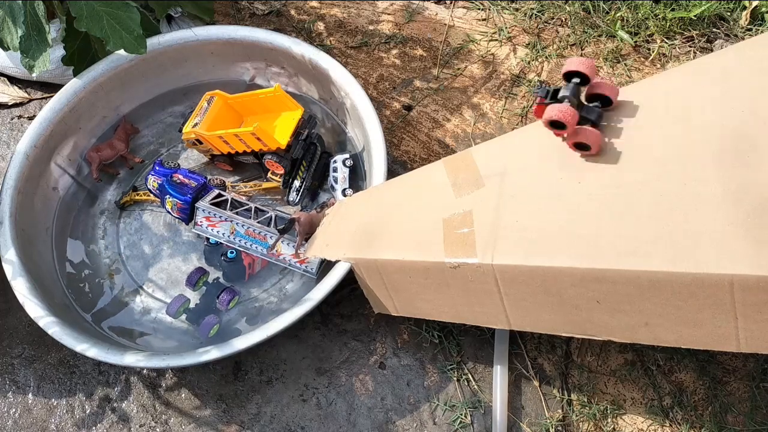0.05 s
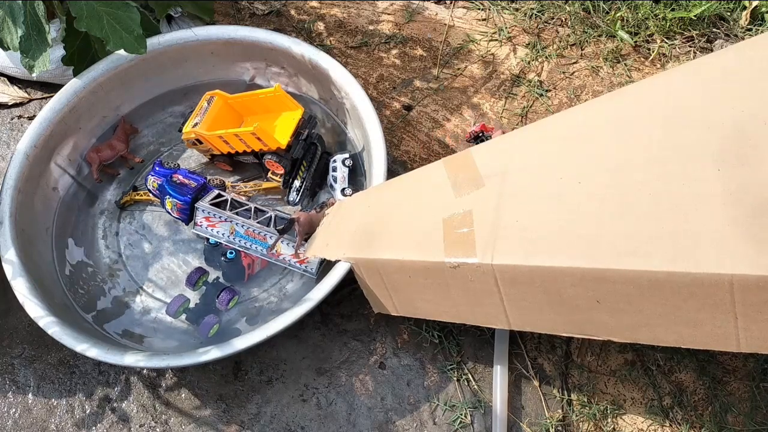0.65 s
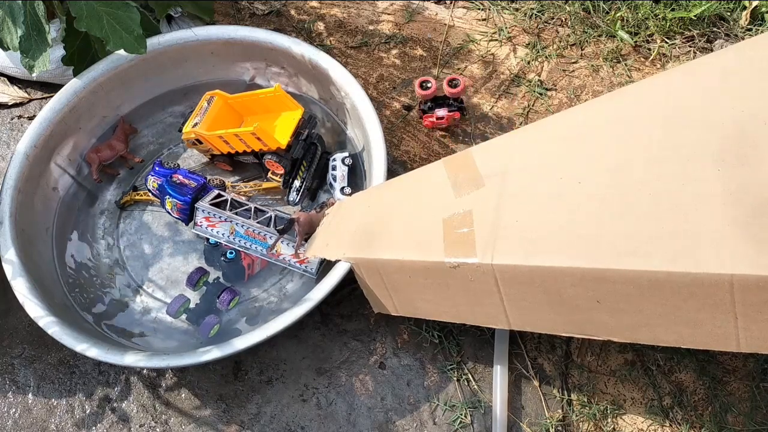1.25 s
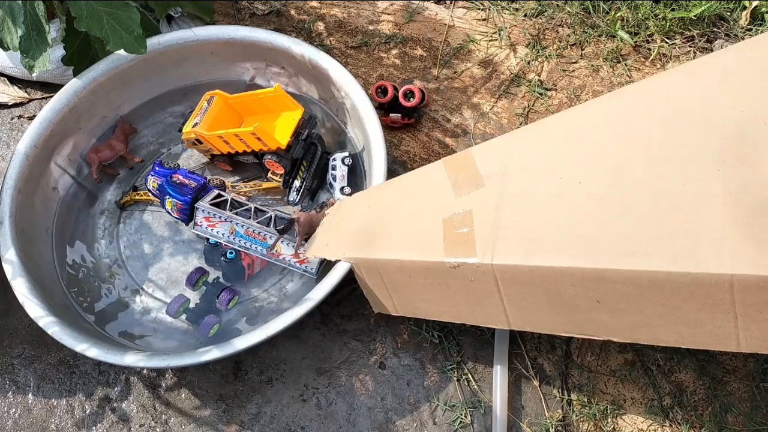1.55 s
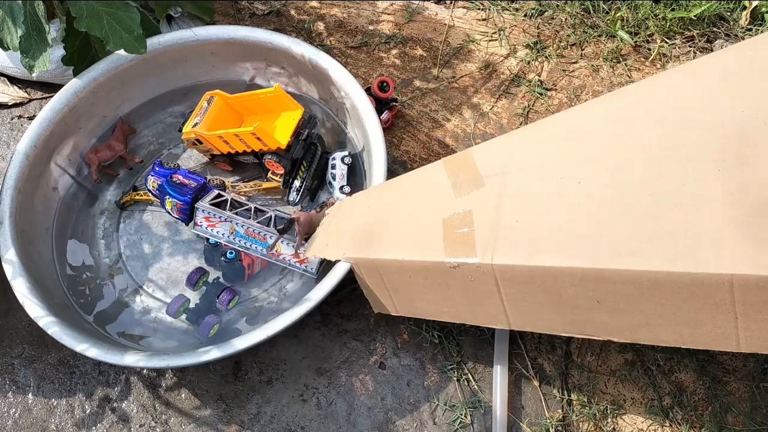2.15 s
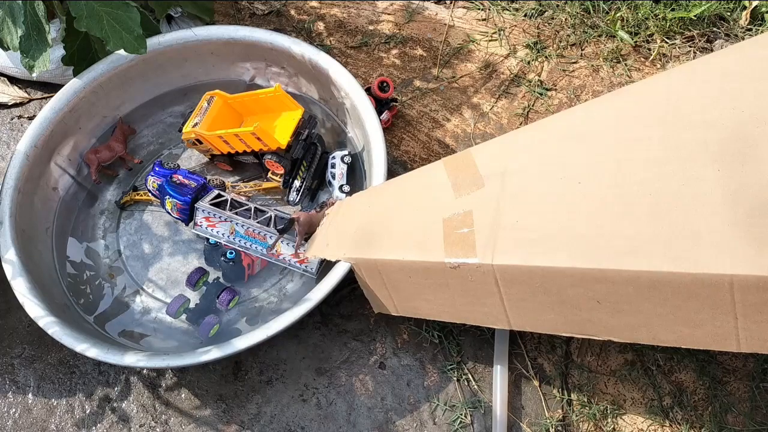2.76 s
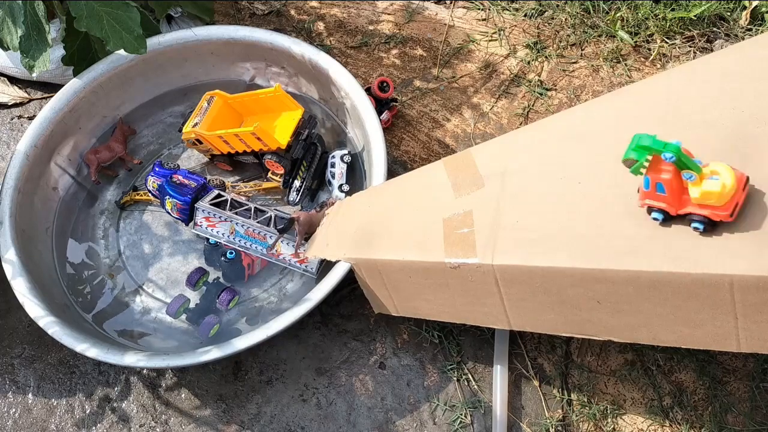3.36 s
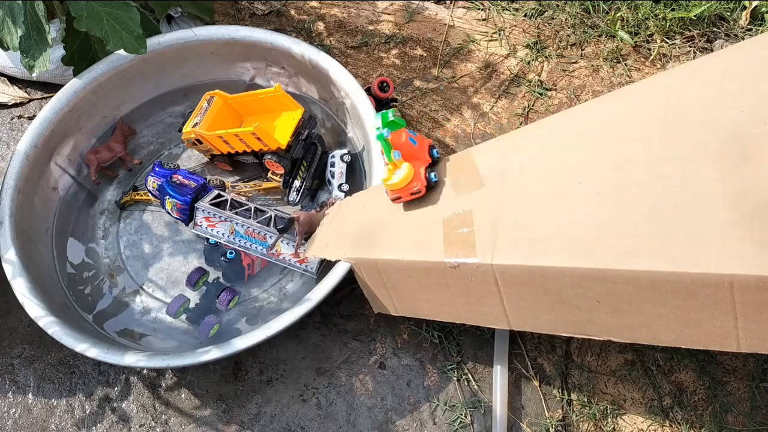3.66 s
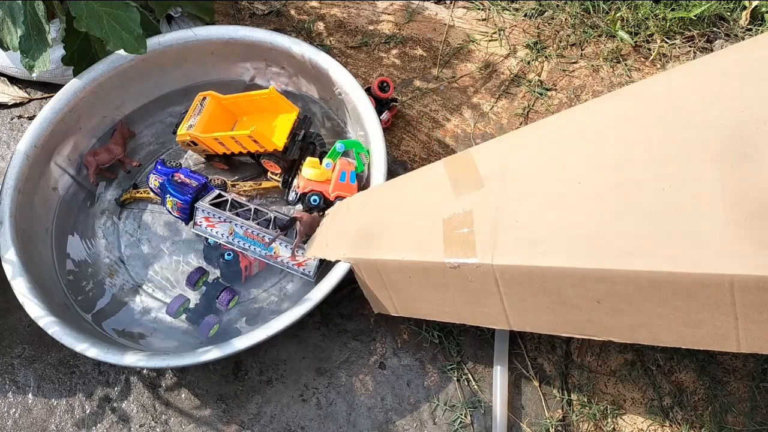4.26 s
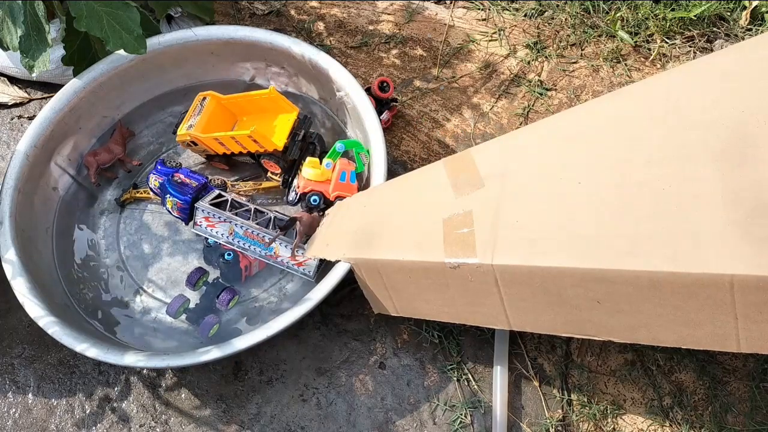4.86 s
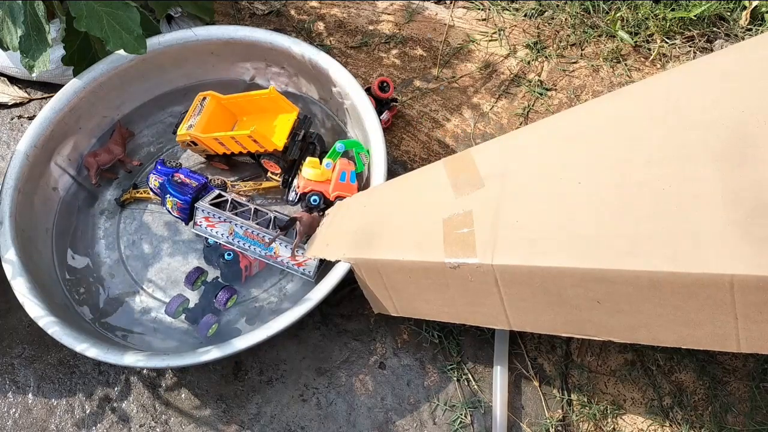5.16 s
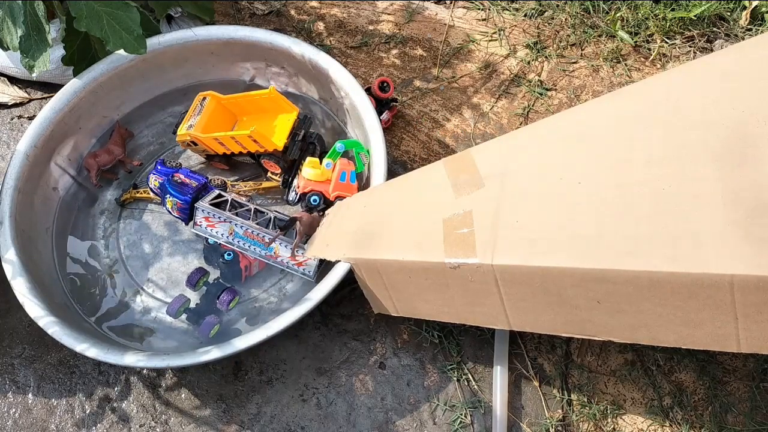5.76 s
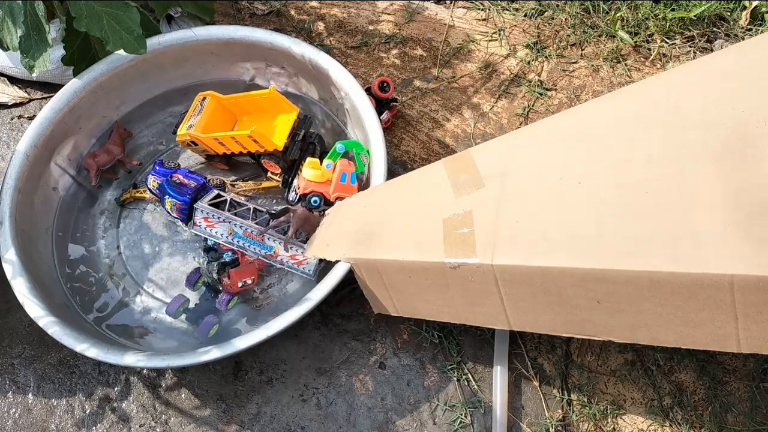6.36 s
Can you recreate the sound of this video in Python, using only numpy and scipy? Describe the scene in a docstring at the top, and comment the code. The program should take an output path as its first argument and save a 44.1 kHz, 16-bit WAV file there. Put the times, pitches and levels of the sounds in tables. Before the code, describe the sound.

A toy truck is revved twice, whirrs and thumps down a cardboard ramp; a second toy rumbles down and clatters into a metal basin.

```python
"""Two rasping, whining pushes spin up the flywheel of a friction-motor toy truck, outdoors. Its gears
whirr as it thumps down a cardboard ramp, tumbles off and coasts to a stop. A second toy is set on the
board, rumbles down on hard wheels, clatters into other toys and strikes a water-damped metal basin.
Gear teeth chatter in the gearbox; wheels and blows ring the board. Faint yard air lies behind."""
import sys
import numpy as np
from scipy import signal
from scipy.fft import rfft, irfft, next_fast_len
from scipy.io import wavfile
from scipy.ndimage import uniform_filter1d, map_coordinates

SR = 44100
rng = np.random.default_rng(int(sys.argv[2]) if len(sys.argv) > 2 else 0)


def put_to_file(sound):
    """Save the sound as 16-bit audio at rate SR, in the file named by the first command-line argument."""
    columns = np.atleast_2d(sound).T  # one column per channel
    safe = np.clip(columns, -1, 1)
    whole_steps = np.round(safe * 32767)
    wavfile.write(sys.argv[1], SR, whole_steps.astype(np.int16))


N = 287091

# gear chatter spectrum (frequency [Hz], density [dB])
GEAR_SPECTRUM = [(250, -23), (500, -19.5), (1250, -12.5), (1900, -3), (3000, -6.5), (4200, -6.5),
                 (4900, -10.5), (7200, -15), (8300, -18), (9500, -23), (10800, -19.5), (15500, -28)]
# gearbox resonances (frequency [Hz], width [Hz], lift [dB])
GEARBOX_MODES = [(3570, 150, 2.5), (4420, 99, 8.5), (5520, 260, 4.5)]
# a band near 2 kHz sweeping through the whirr as the truck moves (time [s], frequency [Hz])
SWEEP_PITCH = [(.08, 2080), (.26, 2550), (.7, 2020), (.98, 2680), (1.22, 1850), (1.5, 2250), (2.3, 1780),
               (2.85, 2020), (4.3, 1650)]
# coasting gear train (time [s], level [dB])
COAST_LEVEL = [(0, -34.5), (.37, -37.5), (.56, -32), (.95, -32.5), (1.12, -28.5), (1.65, -33), (2.12, -31),
               (2.5, -33.5), (2.7, -39), (3.2, -41.5), (3.9, -44.5)]
# spin-up pushes (start [s], attack [s], hold [s], gear chatter [dB], tyre scrub [dB])
PUSHES = [(0.386, 0.088, .035, -25.5, -39.5), (0.979, .01, 0.082, -25, -40.5)]


def gear_whirr(body_db=-2, sweep_db=-6.5, hiss_db=-7.5, push_hiss_db=-3, split_hz=7000):
    """Loose gear teeth chatter: louder and brighter under a push, fading as the truck coasts."""
    coast_db, = curves(COAST_LEVEL)
    stall = (1 - ramp(3.9, .44)) ** 1.37  # friction stops the gears
    coast = amp(coast_db) * stall
    push = sum(amp(db) * envelope(s, attack_s, hold_s, .03) for s, attack_s, hold_s, db, _ in PUSHES)
    teeth = shifting(grains(rate_hz=2200, life_s=.0008, spread_db=2), depth_db=2.8, size=512, frames=14)
    chatter = unit(lifted(coloured(teeth, GEAR_SPECTRUM), GEARBOX_MODES))
    body = filtered(chatter, lambda hz: 1 / (1 + (hz / split_hz) ** 8))
    sweep = np.array([resonance(curves(SWEEP_PITCH)[0], width_hz=160) for _ in range(2)])
    shadow_db = -3.5 * ramp(2.2, .299)  # truck drops behind the board
    bright_db = hiss_db + .25 * (coast_db - coast_db.max()) + shadow_db
    fade_db = -1.5 * ramp(TYRE_CONTACTS[0][0], .13)  # the sweep is fainter once on the board
    sweep_gain = amp(sweep_db + fade_db + 2.6 * wobble(20))
    whirr = amp(body_db) * np.hypot(coast, push) * unit(body) + sweep_gain * coast * sweep
    hiss = np.hypot(coast * amp(bright_db), push * amp(push_hiss_db)) * unit(chatter - body)
    return (whirr + hiss) * amp(wobble(45))


# wheel surges (start [s], length [s], first tooth rate [Hz], last [Hz], level [dB], overtone lift [dB])
SURGES = [(.434, .02, 3100, 3680, -23, -9), (.454, .066, 2200, 3600, -26.5, 0),
          (1.016, .054, 2900, 4000, -23, -2)]
# tooth-mesh overtones (harmonic number, level [dB])
MESH_OVERTONES = [(2, -3), (3, -3), (4, -13)]


def gear_whine(gain_db=-.5):
    """Under a push the teeth mesh firmly: a rough note gliding up in an S."""
    out = np.zeros((2, N))
    jitter = 1 + .022 * wobble(1500)
    flutter_db = 2.5 * wobble(500)
    for s, length_s, first_hz, last_hz, db, lift_db in SURGES:
        progress = ramp(s, length_s)
        on = (progress > 0) & (progress < 1)
        hz = first_hz + (last_hz - first_hz) * np.sin(np.pi / 2 * progress[on]) ** 2
        phase = 2 * np.pi * np.cumsum(hz * jitter[on]) / SR
        gain = amp(db + gain_db + flutter_db[on]) * np.sqrt(2 * np.sin(np.pi * progress[on]))
        partials = [(1, 0)] + [(k, partial_db + lift_db) for k, partial_db in MESH_OVERTONES]
        for k, partial_db in partials:
            out[:, on] += gain * amp(partial_db) * np.sin(k * phase + rng.uniform(0, np.pi / 2, (2, 1)))
    return out


# flywheel spin (time [s], speed [rev/s], hum [dB])
FLYWHEEL_SPIN = [(.52, 487, -57), (.97, 410, -64), (1.08, 510, -51), (1.4, 476, -62), (1.75, 425, -69),
                 (2.4, 350, -64)]


def flywheel(rasp_db=20, pinion_teeth=8):
    """The coasting flywheel hums and its pinion rasps."""
    spin_hz, hum_db = curves(FLYWHEEL_SPIN)
    hum = np.sin(2 * np.pi * np.cumsum(spin_hz) / SR)
    rasp = resonance(pinion_teeth * spin_hz, width_hz=240)
    return amp(hum_db) * during(FLYWHEEL_SPIN) * (hum + amp(rasp_db) * rasp)


def tyre_scrub():
    """Rubber tyres drag over the ground during the pushes."""
    level = sum(amp(db) * envelope(s, attack_s, hold_s, .061) for s, attack_s, hold_s, _, db in PUSHES)
    slips = grains(rate_hz=680, life_s=.001, spread_db=8)
    return level * coloured(slips, [(80, -25), (200, -4.5), (700, -10.5), (1300, -2), (2500, -30)])


# tyres on the board between hops (start [s], attack [s], hold [s], release [s], level [dB])
TYRE_CONTACTS = [(1.716, .035, 0.053, .017, -27), (1.877, .004, .37, 0.053, -25.5),
                 (2.387, 0.011, .012, 0.028, -32.5)]
# soft tyres on cardboard (frequency [Hz], density [dB])
TYRE_SPECTRUM = [(41, -11.5), (70, -4), (118, -6.5), (252, -3), (343, -3), (473, -14), (538, -17.5),
                 (790, -13.5), (1070, -23), (1500, -25), (1950, -40), (3300, -120)]
# board note under the truck (time [s], frequency [Hz])
TRUCK_NOTE = [(1.82, 415.5), (1.92, 290), (2.28, 204.4)]


def truck_rolling(tyres_db=-5, note_db=-8, growth_db_per_s=15):
    """Soft tyres patter over the corrugations, louder as the truck gathers speed."""
    patter = shifting(grains(rate_hz=200, life_s=.005, spread_db=2), depth_db=3.5, size=2048, frames=4)
    level = np.zeros(N)
    for s, attack_s, hold_s, release_s, db in TYRE_CONTACTS:
        growth_db = growth_db_per_s * hold_s * ramp(s, hold_s)
        level += amp(db + growth_db) * envelope(s, attack_s, hold_s, release_s)
    tyres = coloured(patter, TYRE_SPECTRUM)
    return level * (amp(tyres_db) * tyres + amp(note_db) * board_note(TRUCK_NOTE))


def board_note(pitch_rows):
    """The board's resonance, driven evenly by the wheels."""
    note = resonance(curves(pitch_rows)[0], width_hz=40)
    power = np.abs(uniform_filter1d(note ** 2, size=3000))
    return note / np.sqrt(power + .19)


# blows on the cardboard (time [s], level [dB], panel pitch [Hz])
BOARD_BLOWS = [(1.8, -15, 407), (1.882, -13, 298), (2.087, -17.5, 262), (2.119, -15.5, 232),
               (2.19, -17.5, 293), (4.491, -20, 397), (4.498, -25, 727), (4.584, -32.5, 449),
               (5.277, -16, 416), (5.483, -18, 627), (5.748, -17, 276), (5.788, -19, 314),
               (5.946, -17.5, 516)]
# struck cardboard (frequency [Hz], density [dB])
PANEL_SPECTRUM = [(59, -51.5), (100, -27), (210, -8), (417, -6.5), (553, -5.5), (608, -10), (1160, -13.5),
                  (1500, -33), (1940, -24), (2500, -21), (3250, -63), (5500, -120)]


def thumps(tone_db=-2, slap_db=-10.5, panel_t60_s=.1, edge_t60_s=.18):
    """Each blow rings the part of the board it lands on; the free edge rings longer."""
    out = np.zeros((2, N))
    for blows, t60_s in [(BOARD_BLOWS, panel_t60_s), (judder(), edge_t60_s)]:
        for s, db, hz in blows:
            slap = burst(PANEL_SPECTRUM, [(250, .078), (550, .39), (1000, .048), (2500, .05)])
            add(out, s, amp(db) * (amp(tone_db) * ring(hz, t60_s) + amp(slap_db) * slap))
    return out


def judder(start_s=2.493, gap_s=.0155, hz=572.5, db=-15.5, swell_db=3.5, count=7):
    """The tumbling truck judders on the board's edge: rows of (time [s], level [dB], pitch [Hz])."""
    k = np.arange(count)
    late_s, detune = rng.standard_normal((2, count)) * [[.002], [.06]]
    times_s = start_s + gap_s * k + late_s * (k > 0)
    swell = np.sin(np.pi * (k + .5) / count)
    return list(zip(times_s, db + swell_db * swell, hz * (1 + detune)))


TOY_START_S, TOY_FREE_S, TOY_EXIT_S = 4.937, 5.054, 5.925
# hard wheels on cardboard (frequency [Hz], density [dB])
WHEEL_SPECTRUM = [(60, -5), (120, -10), (170, -3), (290, -2.5), (480, -7), (850, -8.5), (1080, -17),
                  (1400, -21.5), (2200, -22.5), (4000, -44)]
# board resonances (frequency [Hz], width [Hz], lift [dB])
BOARD_MODES = [(279, 15, 3), (398, 16, 6), (620, 62, 3), (728, 26, 6), (864, 170, 2.5), (1216, 95, 7)]
# board note under the second toy (time [s], frequency [Hz])
TOY_NOTE = [(5.25, 410), (5.33, 638), (5.55, 600), (5.62, 256), (5.78, 274.6), (5.92, 504)]


def toy_rolling(wheels_db=-20, note_db=-25, held_db=-8, support_s=5.751, support_db_per_s=94):
    """Hard wheels boom the board with speed; muted by a hand at first, then by the supported end."""
    patter = shifting(grains(rate_hz=600, life_s=.003, spread_db=2), depth_db=3, size=2048, frames=4)
    wheels = unit(lifted(coloured(patter, WHEEL_SPECTRUM), BOARD_MODES))
    muted_db = held_db * (clock() < TOY_FREE_S) - support_db_per_s * np.maximum(clock() - support_s, 0)
    level = toy_speed() * amp(muted_db)
    return level * (amp(wheels_db) * wheels + amp(note_db) * board_note(TOY_NOTE))


def toy_speed(stop_s=.03):
    """Second toy's even acceleration: 0 at rest, 1 at the ramp's end, then quickly 0."""
    return ramp(TOY_START_S, TOY_EXIT_S - TOY_START_S) * (1 - ramp(TOY_EXIT_S, stop_s))


# plastic impacts (time [s], level [dB], relative treble [dB], hollow pitch [Hz], rebound loss [dB])
PLASTIC_HITS = [(.985, -14, -14.5, 3000, 11.5), (2.512, -13.5, -12, 2160, 5.5),
                (2.575, -19, -11, 2230, 20.5), (2.747, -15, -12.5, 2340, 6.5),
                (2.902, -24.5, -12.5, 2600, 17), (2.966, -25.5, -10, 2600, 19),
                (3.838, -31, -6.5, 3800, 20), (4.499, -31.5, -27, 2380, 16), (5.053, -31.5, -30, 2740, 20),
                (5.716, -20.5, -17, 2100, 20), (5.786, -23, -16, 3530, 22), (5.924, -6, -27.5, 2400, 6.5),
                (5.947, -10, -36, 1480, 17), (5.962, -8.5, -28, 2050, 10.5), (6.034, -6.5, -21, 940, 24),
                (6.094, -24, -26, 894, 18), (6.128, -25, -30.5, 1590, 20), (6.1699, -11.5, -14, 3360, 25),
                (6.31, -38.5, -30, 3100, 20)]
# struck plastic (frequency [Hz], density [dB])
PLASTIC_SPECTRUM = [(240, -19), (400, -11.5), (535, -8), (663, -11.5), (1020, -12.5), (1320, -6.5),
                    (1880, -5.5), (2750, -10.5), (3790, -12), (5560, -24), (15500, -51.5)]
# its decay (frequency [Hz], T60 [s])
PLASTIC_T60 = [(500, 0.3), (2000, 0.1), (5000, 0.11), (14000, 0.12)]


def clacks(body_db=-9, snap_db=-6, hollow_db=8, rebound_s=.0115, contacts=4):
    """Plastic strikes plastic and rebounds: a short hollow ring under a snap."""
    out = np.zeros((2, N))
    for s, db, treble_db, hz, loss_db in PLASTIC_HITS:
        hollow_mode = [(hz, .27 * hz, hollow_db)]
        for k in range(contacts):
            body = lifted(burst(PLASTIC_SPECTRUM, PLASTIC_T60), hollow_mode) / amp(hollow_db / 2)
            snap = burst([(2500, -36), (6000, -2), (15000, -9)], [(3000, .32), (14000, .07)])
            clack = amp(body_db) * body + amp(snap_db + treble_db) * snap
            add(out, s + k * rebound_s, amp(db - k * loss_db) * clack)
    return out


# basin modes (frequency [Hz], level [dB], T60 [s])
BASIN_MODES = [(340, -16.5, 0.19), (530, -4.5, 0.38), (557, 0, 0.35), (720, -19, 0.27), (990, 4, 0.28),
               (1200, -6, 0.4), (1345, 7, 0.29), (1470, 4, 0.3), (1500, -3, 0.2), (1650, -6.5, 0.38),
               (1780, 2, 0.34), (1900, -9.5, 0.33), (1954, -2.5, 0.31), (2030, 1, 0.25), (2020, 4, 0.27),
               (2363, -5, 0.24), (2490, -10, 0.45), (2520, -12.5, 0.17), (2853, -22, 0.15),
               (3920, -14.5, 0.15)]
# modes of its water-loaded floor (frequency [Hz], level [dB], T60 [s])
FLOOR_MODES = [(161.7, -16, 0.35), (373, -3.5, 0.43), (413, -11.5, 0.26)]
# wash of crowded modes (frequency [Hz], density [dB])
WASH_SPECTRUM = [(88, -48), (150, -4.5), (234, -40), (302, -5), (509, -12), (643, -17), (985, -4),
                 (1150, -23), (1340, -9.5), (4060, -11), (15500, -40)]
# its decay (frequency [Hz], T60 [s])
WASH_T60 = [(300, 0.34), (2000, 0.32), (5000, 0.15), (14000, 0.13)]


def basin(strike_s=6.171, modes_db=-31, wash_db=-23):
    """The toy strikes the metal basin; water damps the ring."""
    out = np.zeros((2, N))
    modes = sum(amp(db) * ring(hz, t60_s, rng.uniform(0, np.pi, (2, 1))) * rng.choice([-1, 1])
                for hz, db, t60_s in [*BASIN_MODES, *FLOOR_MODES])
    add(out, strike_s, amp(modes_db) * modes + amp(wash_db) * burst(WASH_SPECTRUM, WASH_T60))
    return out


# axles in their slots (frequency [Hz], density [dB])
RATTLE_SPECTRUM = [(1000, -40), (1600, -3), (2300, 1), (2800, -6), (3500, -5), (5000, -18), (8000, -45)]
# axle hiss (frequency [Hz], density [dB])
AXLE_SPECTRUM = [(2500, -30), (5000, -2), (7200, 0), (9500, -7), (15500, -13)]


def axle_rattle(rattle_db=-38, spin_db=-50, lip_db=-42.5, lip_s=5.845):
    """Once let go, the second toy's axles rattle and hiss with speed; wheels hiss over the ramp's lip."""
    speed = toy_speed()
    knocks = shifting(grains(rate_hz=220, life_s=.004, spread_db=4), depth_db=3, size=512, frames=14)
    spin = grains(rate_hz=300, life_s=.01, spread_db=3)
    lip = amp(lip_db) * envelope(lip_s, attack_s=.0405, hold_s=.03, release_s=.03)
    rattle = amp(rattle_db) * speed ** 1.21 * coloured(knocks, RATTLE_SPECTRUM)
    hiss = (amp(spin_db) * speed ** 1.3 + lip) * coloured(spin, AXLE_SPECTRUM)
    return ramp(TOY_FREE_S, .003) * (rattle + hiss)


# second toy's wheel catches (time [s], level [dB])
WHEEL_TICKS = [(5.1008, -47), (5.1976, -46), (5.3652, -41), (5.5248, -38), (5.5558, -35), (5.6186, -34),
               (5.6865, -36.5), (5.7882, -33)]


def wheel_ticks(gain_db=-9, t60_s=.1):
    """A wheel catches on its axle with a thin bright tick."""
    out = np.zeros((2, N))
    for s, db in WHEEL_TICKS:
        add(out, s, amp(db + gain_db) * burst(AXLE_SPECTRUM, [(7000, t60_s)]))
    return out


# yard hiss (frequency [Hz], density [dB])
AIR_SPECTRUM = [(200, -15), (400, -14.5), (1000, -21), (3000, -24.5), (4000, -22.5), (6500, -32.5),
                (15500, -40.5)]
# distant rumble (frequency [Hz], density [dB])
RUMBLE_SPECTRUM = [(12, -15.5), (25, -4), (50, 2.5), (95, -1), (150, -9), (260, -19), (600, -48.5),
                   (2000, -75.5)]


def outdoor_air(hiss_db=-62, rumble_db=-56):
    """Faint yard hiss over a distant rumble."""
    hiss = amp(hiss_db + .67 * wobble(4.4)) * coloured(rng.standard_normal((2, N)), AIR_SPECTRUM)
    return hiss + amp(rumble_db) * coloured(rng.standard_normal((2, N)), RUMBLE_SPECTRUM)


def amp(db):
    """Decibels to gain."""
    return 10 ** (np.asarray(db) / 20)


def unit(x):
    """x at rms 1."""
    return x / np.sqrt(np.mean(x ** 2) + 1e-20)


def clock():
    """Sample times in seconds."""
    return np.arange(N) / SR


def ramp(s, length_s):
    """Linear rise from 0 at time s to 1."""
    return np.clip((clock() - s) / length_s, 0, 1)


def envelope(s, attack_s, hold_s, release_s):
    """Linear rise, hold, exponential release."""
    return ramp(s, attack_s) * np.exp(-np.maximum(clock() - s - attack_s - hold_s, 0) / release_s)


def along(points, hz):
    """(frequency [Hz], value) points read on a log axis."""
    knots_hz, values = np.transpose(points)
    return np.interp(np.log(hz + 1), np.log(knots_hz + 1), values)


def curves(rows):
    """Per-sample curve of each column after the time."""
    times_s, *columns = np.transpose(rows)
    return [np.interp(clock(), times_s, column) for column in columns]


def during(rows):
    """Soft gate over a table's time span."""
    t = clock()
    return uniform_filter1d(1. * ((t >= rows[0][0]) & (t <= rows[-1][0])), size=200)


def wobble(rate_hz):
    """Smooth random curve with knots at rate_hz."""
    knots = rng.standard_normal(int(N * rate_hz / SR) + 4)
    return signal.resample(knots, next_fast_len(N))[:N]


def filtered(x, response):
    """x through a frequency response."""
    n = x.shape[-1]
    padded = next_fast_len(n + 8192)
    return irfft(rfft(x, padded) * response(np.fft.rfftfreq(padded, 1 / SR)), padded)[..., :n]


def lifted(x, peaks):
    """x with causal resonant peaks (frequency [Hz], width [Hz], lift [dB])."""
    def response(f):
        return 1 + sum((amp(db) - 1) * 1j * f * width / (hz * hz - f * f + 1j * f * width)
                       for hz, width, db in peaks)
    return filtered(x, response)


# left-right likeness (frequency [Hz], coherence [0..1])
COHERENCE = [(30, .6), (90, .93), (300, .97), (600, .88), (1100, .5), (2500, .35), (6000, .3), (14000, .3)]


def coloured(pair, spectrum):
    """Two unrelated signals shaped into stereo of rms 1, alike in the bass."""
    def response(hz):
        angle = np.arccos(np.clip(along(COHERENCE, hz), -1, 1)) / 2
        return amp(along(spectrum, hz)) * [np.cos(angle), np.sin(angle)]
    mid, side = filtered(pair, response)
    return unit(np.array([mid + side, mid - side]))


def grains(rate_hz, life_s, spread_db):
    """Two white noises pulsed by small random contacts that decay with time constant life_s."""
    hits = (rng.random(N) < rate_hz / SR) * amp(spread_db * np.clip(rng.standard_normal(N), -2, 2))
    power = signal.lfilter([1], [1, -np.exp(-2 / (life_s * SR))], hits ** 2)
    power /= np.abs(uniform_filter1d(power, size=3000)) + 1e-9
    return np.sqrt(power) * rng.standard_normal((2, N))


def shifting(pair, depth_db, size, frames):
    """Resonances come and go as a toy moves: smooth random gain over frequency and time."""
    spectra = signal.stft(pair, nperseg=size)[2]
    field = rng.standard_normal(spectra.shape[1:])
    for _ in range(2):
        field = uniform_filter1d(uniform_filter1d(field, size=2, axis=0), size=frames, axis=1)
    return signal.istft(spectra * amp(depth_db * unit(field)), nperseg=size)[1][:, :N]


def resonance(hz, width_hz):
    """Narrow noise band whose pitch follows hz; rms 1."""
    swell = filtered(rng.standard_normal((2, N)), lambda f: 1 / (1 + (f / width_hz) ** 2))
    phase = 2 * np.pi * np.cumsum(hz) / SR
    return unit(swell[0] * np.sin(phase) + swell[1] * np.cos(phase))


def burst(spectrum, t60s, attack_s=.0003):
    """Crowded modes after a blow: coloured noise decaying by (frequency [Hz], T60 [s])."""
    t = np.arange(SR // 3) / SR
    noise = coloured(rng.standard_normal((2, len(t))), spectrum)
    hz, age_s, spectra = signal.stft(noise, SR, nperseg=256)
    decay = amp(-60 * age_s / along(t60s, hz)[:, None])
    tail = signal.istft(spectra * decay, SR, nperseg=256)[1][:, :len(t)]
    return tail * (1 - np.exp(-t / attack_s))


def ring(hz, t60_s, phase=0):
    """One damped mode."""
    t = np.arange(SR // 3) / SR
    return np.sin(2 * np.pi * hz * t + phase) * np.exp(-np.log(1000) * t / t60_s)


def add(track, s, sound):
    """Mix a sound in at time s."""
    part = track[:, round(s * SR):][:, :sound.shape[-1]]
    part += sound[..., :part.shape[1]]


# path of the moving toy (time [s], bearing [0 = basin, 1 = ramp top, on the right])
BEARING = [(1.9, 1), (2.5, 0.056), (4.3, .05), (4.45, 0.95), (5.35, .95), (5.8, -0.018), (6.2, -.28)]


def scene(board_band_hz=(110, 5500), top_lag_samples=14.28):
    """The toys travel from right to middle; the broad board leans less to one side."""
    bearing, = curves(BEARING)
    pan_db = -1.7 - 2.5 * bearing  # left minus right
    truck = gear_whirr() + gear_whine() + flywheel() + tyre_scrub()
    toys = truck + axle_rattle() + wheel_ticks() + clacks() + basin()
    # an open cardboard sheet radiates little deep bass or high treble
    radiation = signal.butter(2, board_band_hz, "band", fs=SR, output="sos")
    board = signal.sosfilt(radiation, truck_rolling() + toy_rolling() + thumps())
    left, right = toys * amp([pan_db / 2, -pan_db / 2]) + board * amp([[-.5], [.5]])
    left = map_coordinates(left, [np.arange(N) - top_lag_samples * bearing], order=3)
    return np.array([left, right]) + outdoor_air()


def record(dry, top_hz=15900):
    """Brick-wall low-pass."""
    return filtered(dry, lambda hz: hz < top_hz)


dry = scene()
out = record(dry)
put_to_file(out)
```